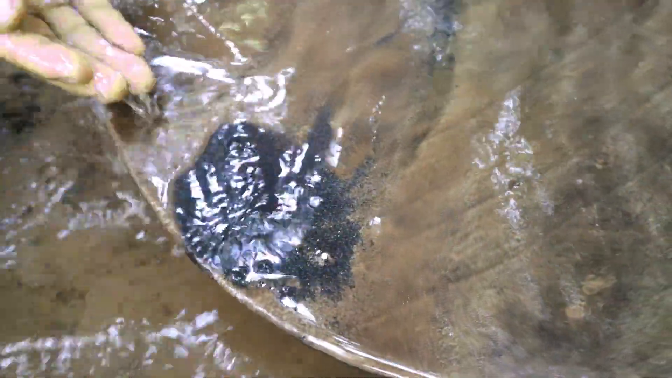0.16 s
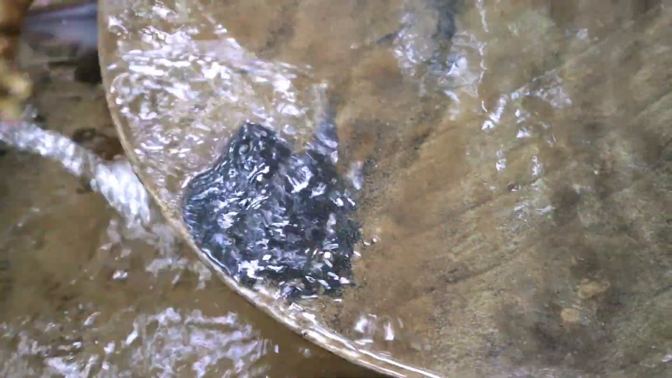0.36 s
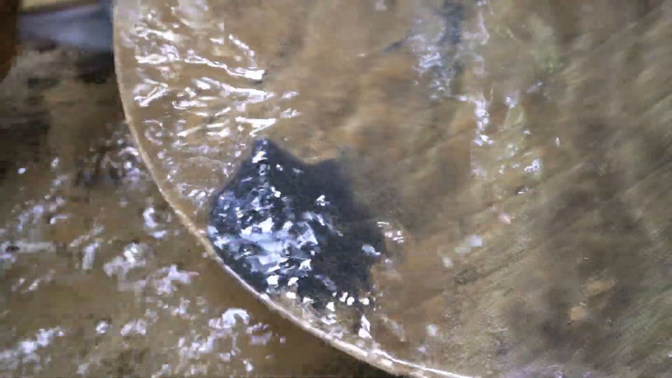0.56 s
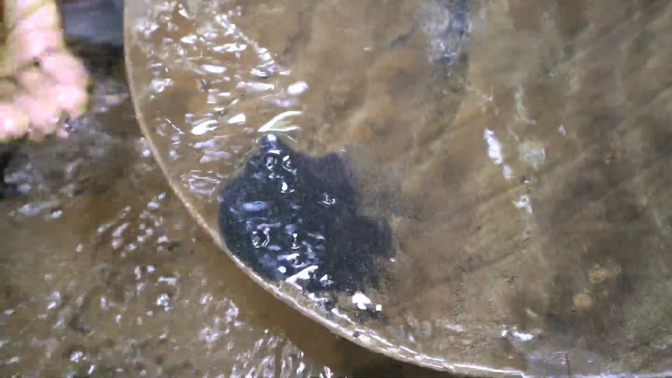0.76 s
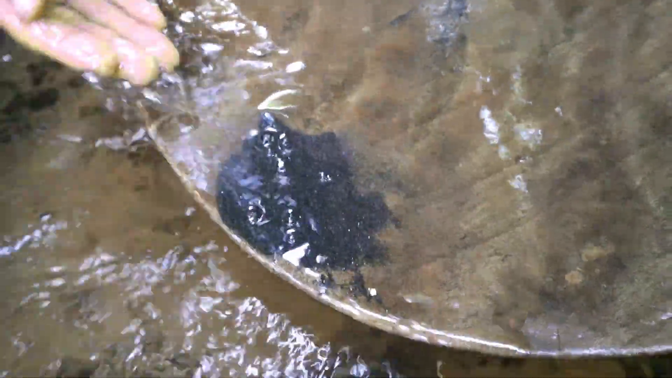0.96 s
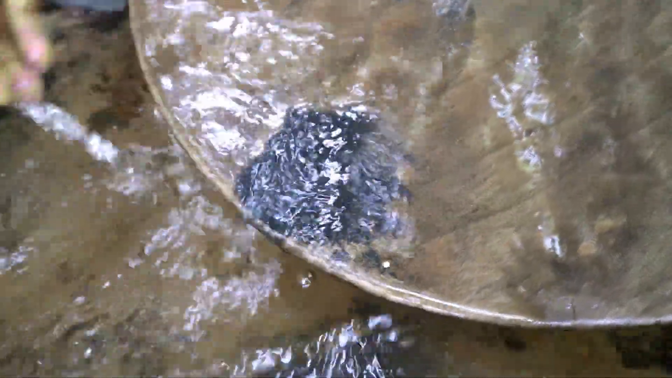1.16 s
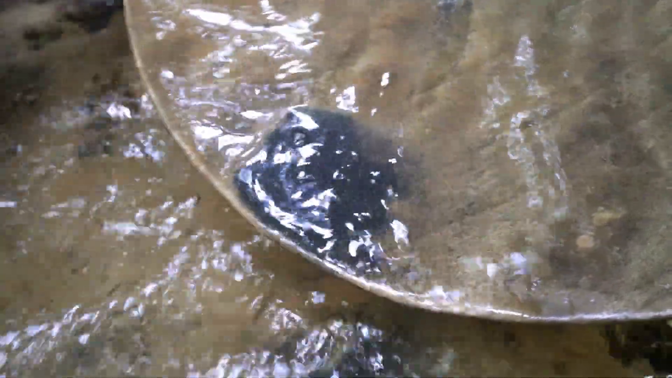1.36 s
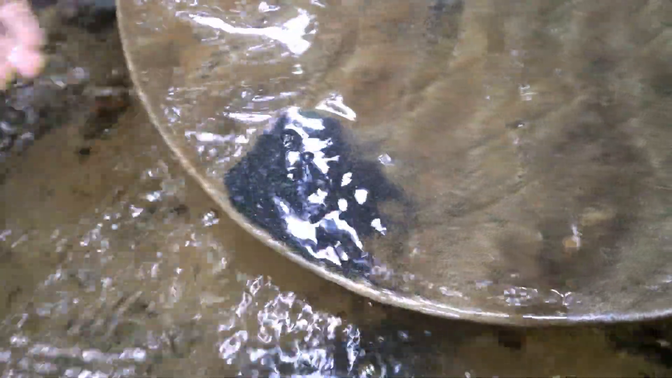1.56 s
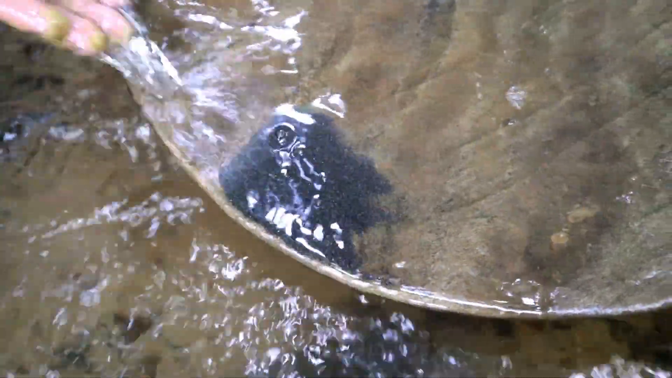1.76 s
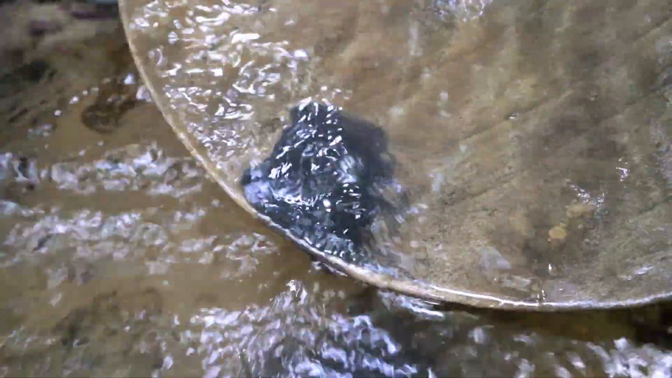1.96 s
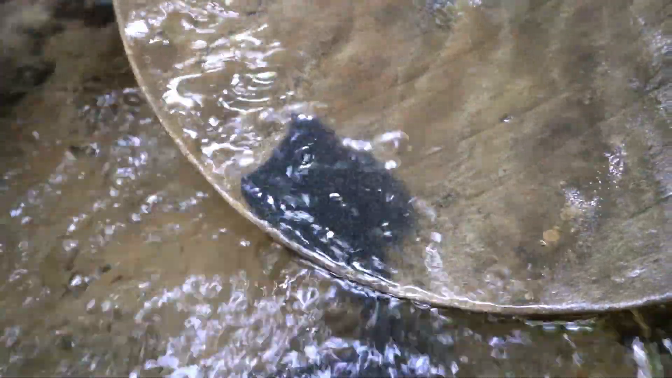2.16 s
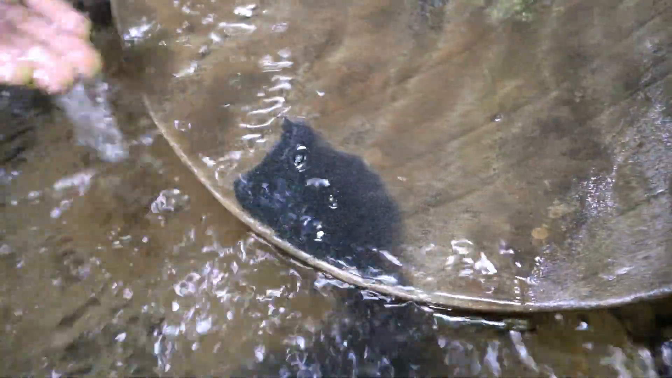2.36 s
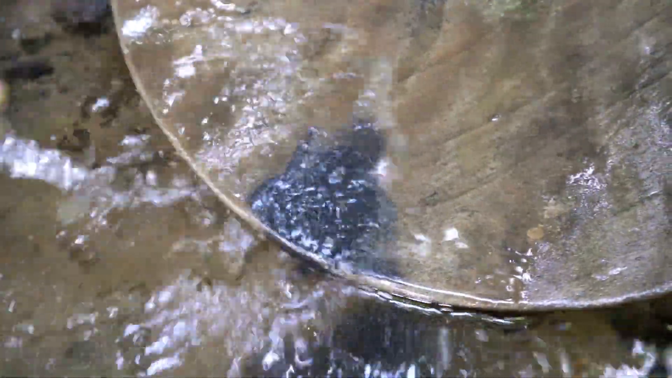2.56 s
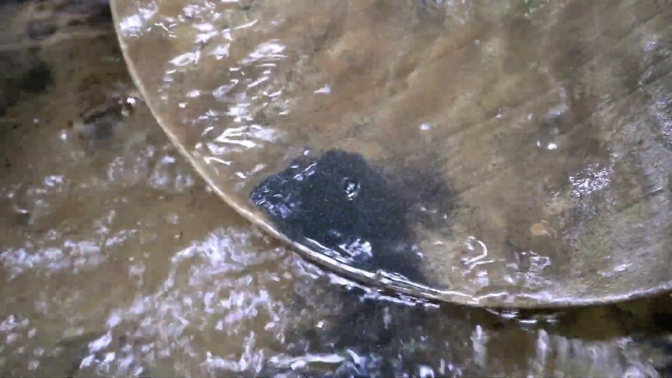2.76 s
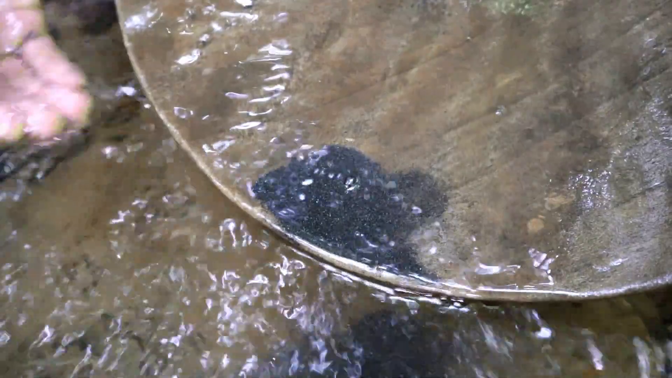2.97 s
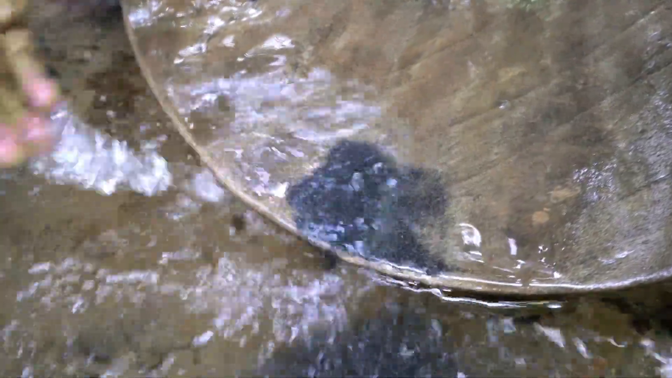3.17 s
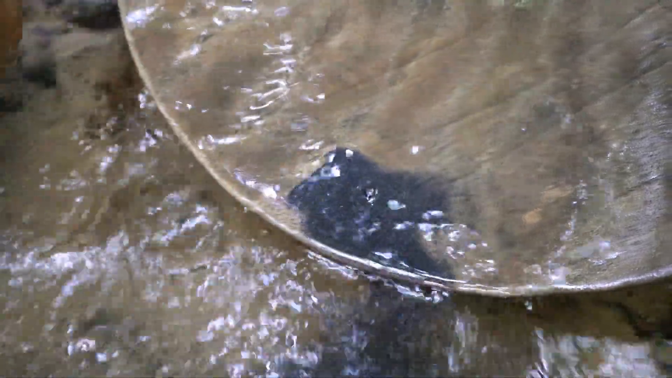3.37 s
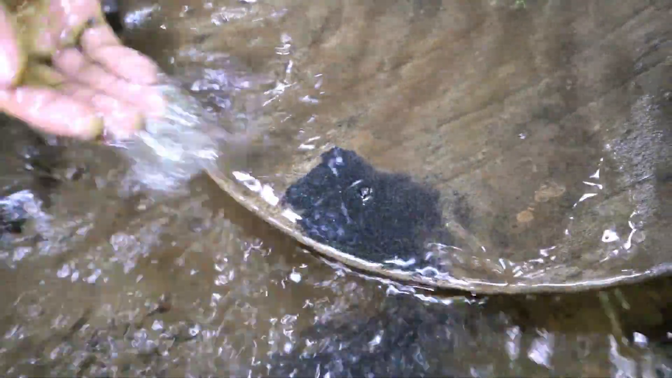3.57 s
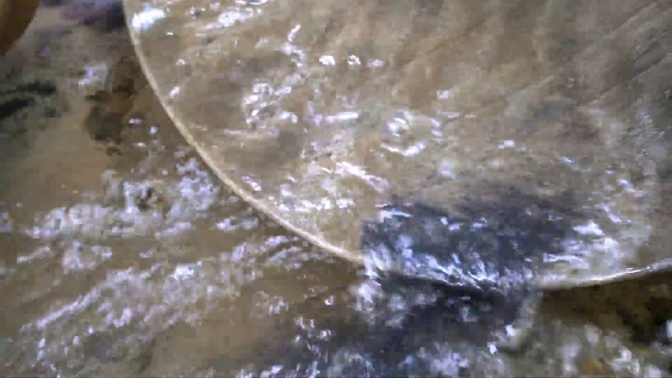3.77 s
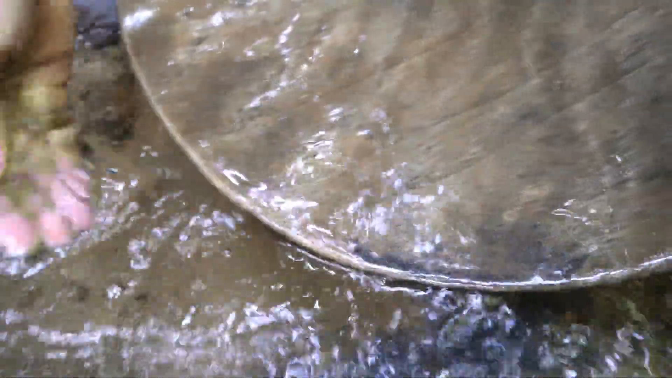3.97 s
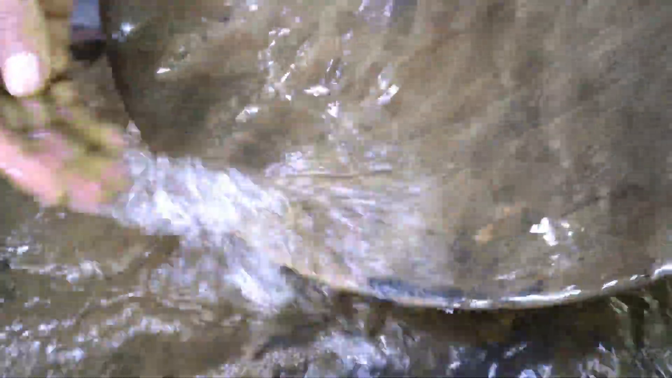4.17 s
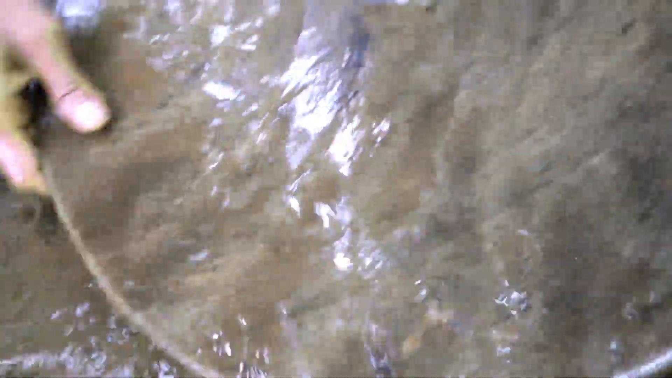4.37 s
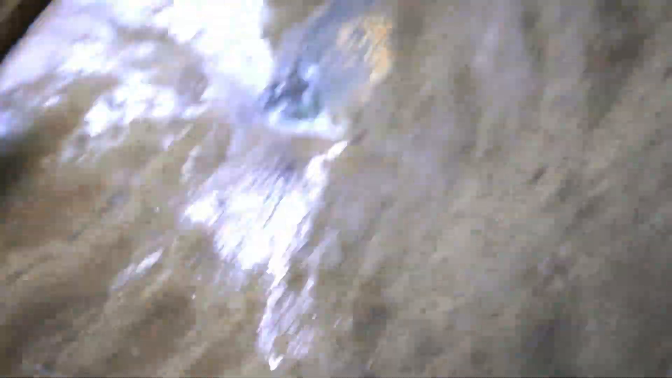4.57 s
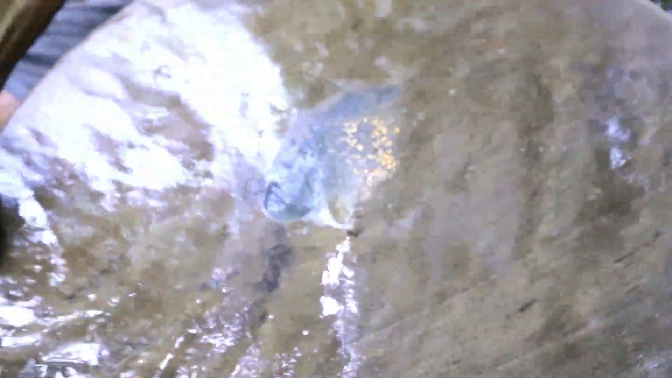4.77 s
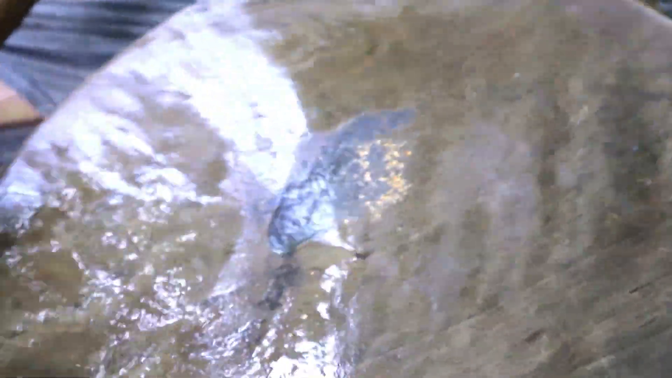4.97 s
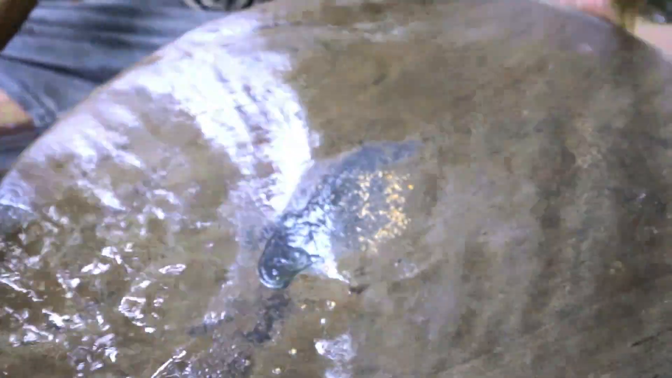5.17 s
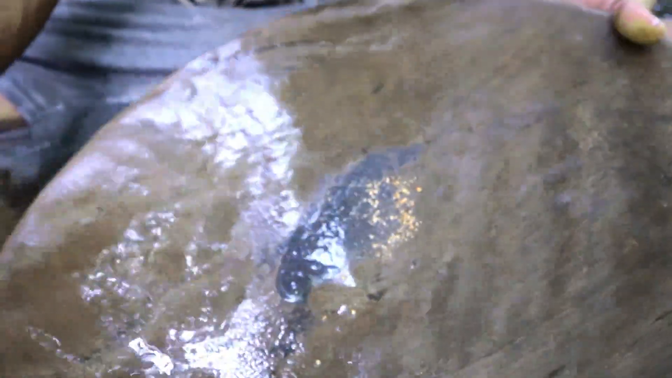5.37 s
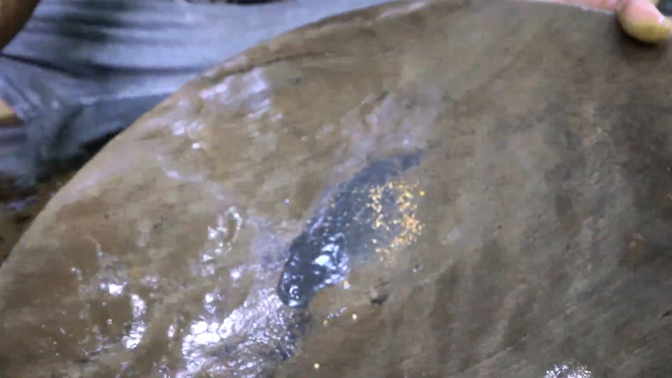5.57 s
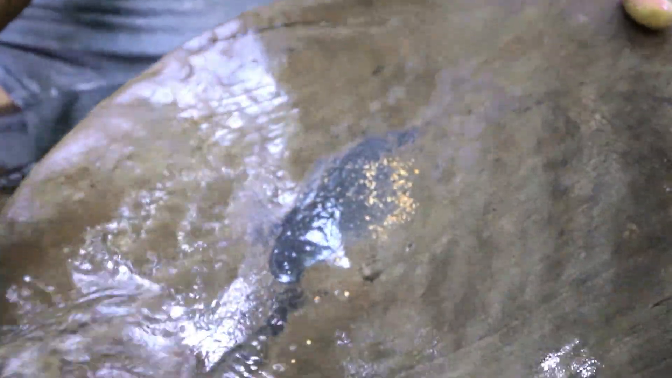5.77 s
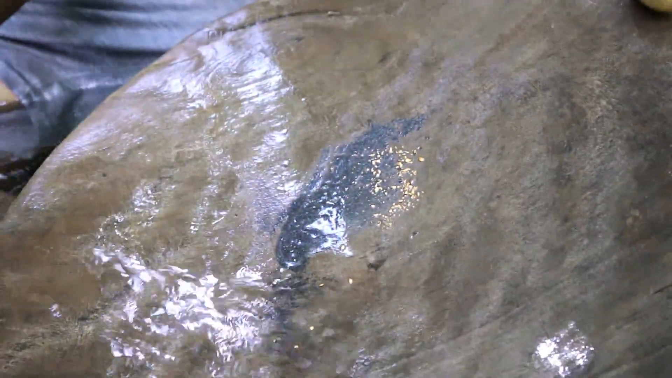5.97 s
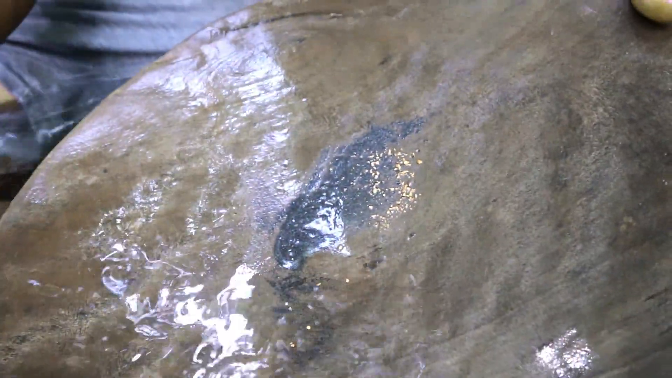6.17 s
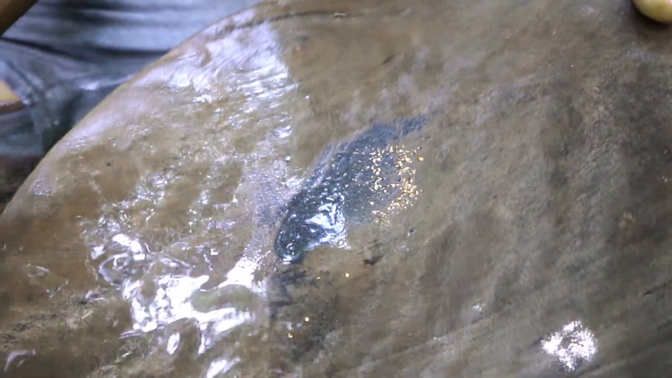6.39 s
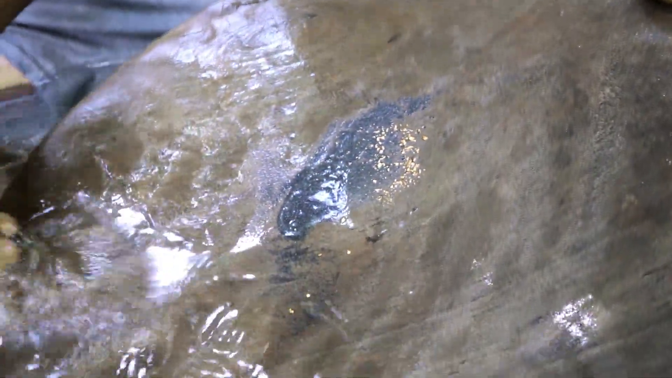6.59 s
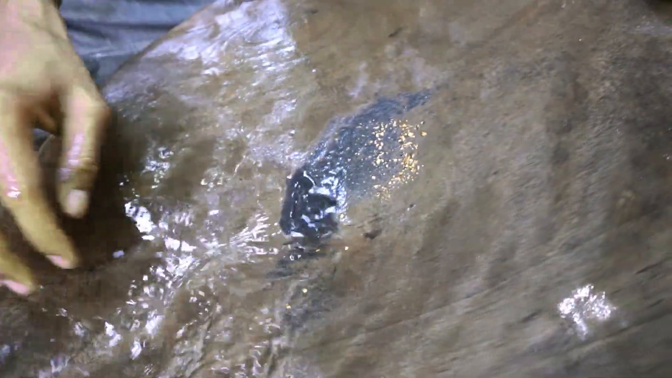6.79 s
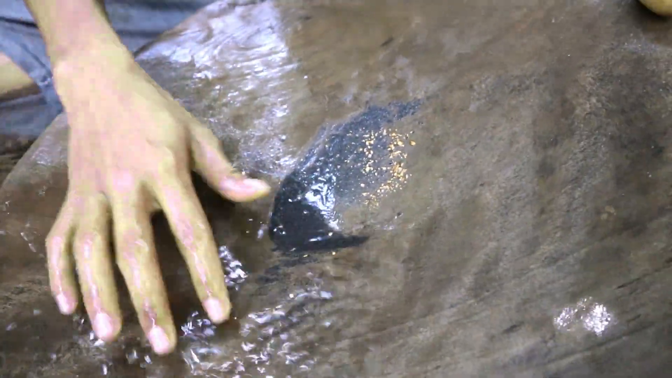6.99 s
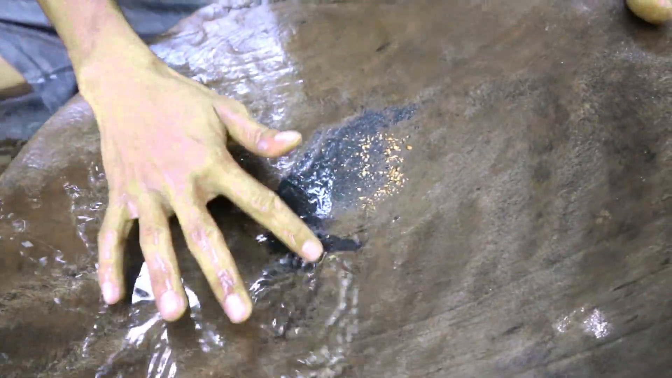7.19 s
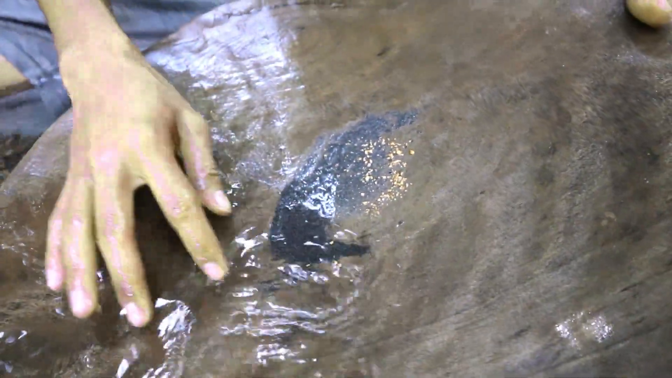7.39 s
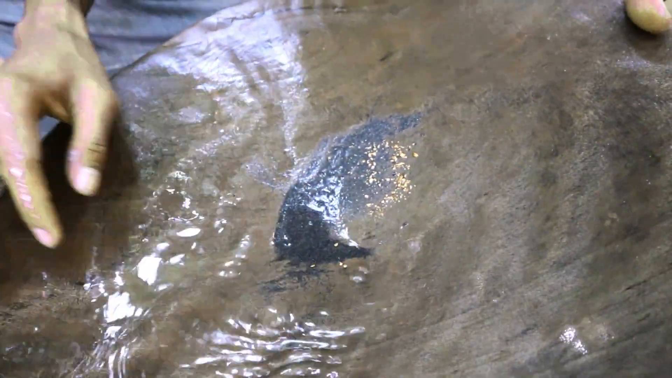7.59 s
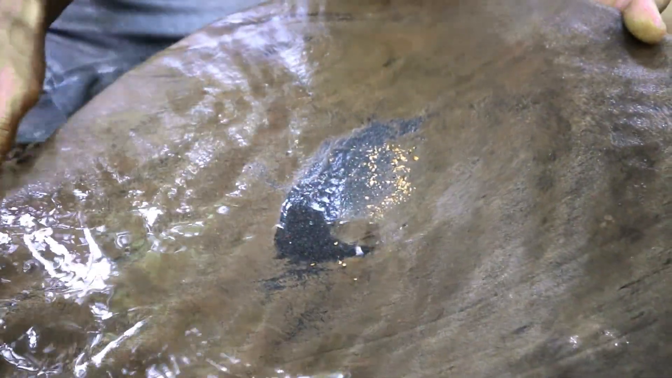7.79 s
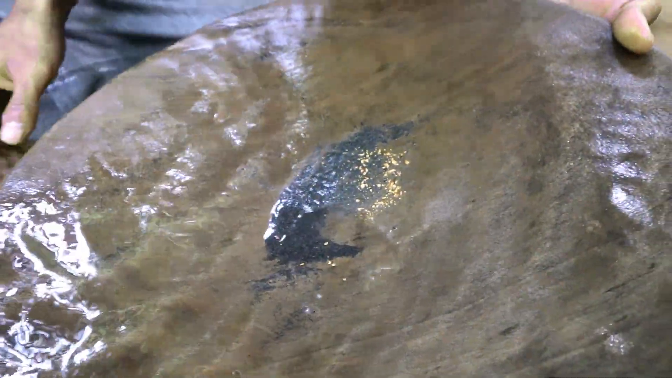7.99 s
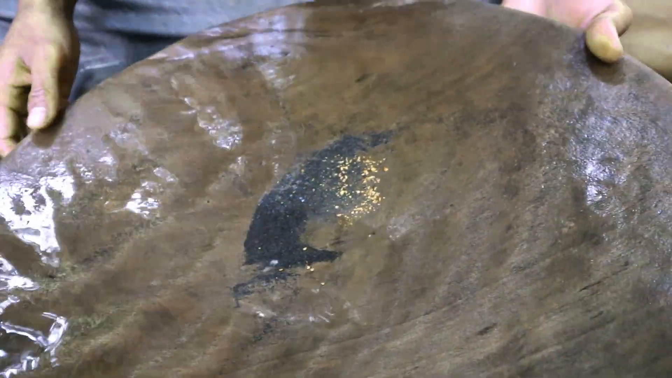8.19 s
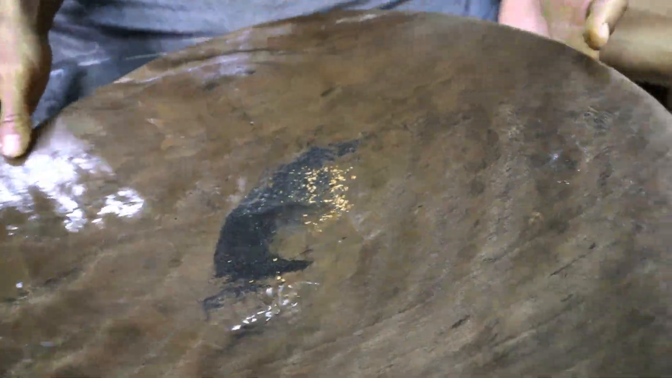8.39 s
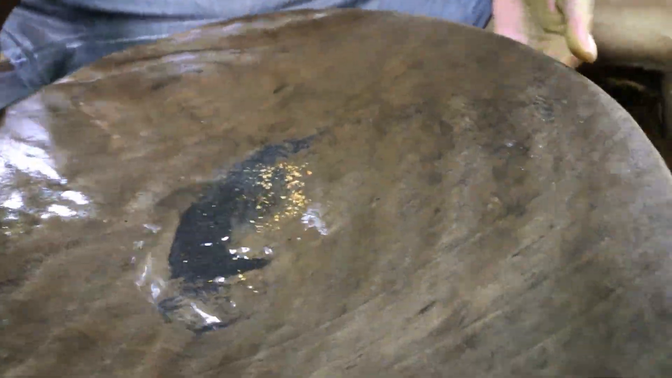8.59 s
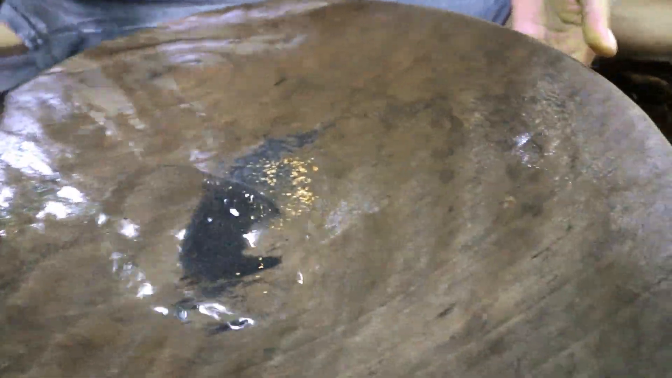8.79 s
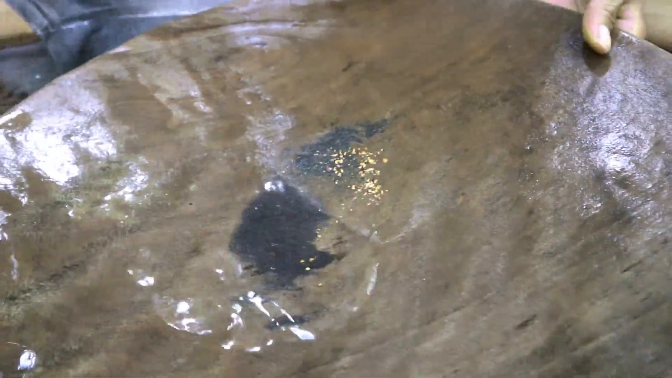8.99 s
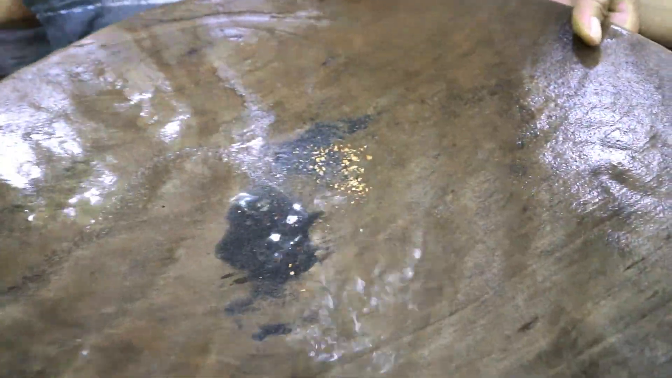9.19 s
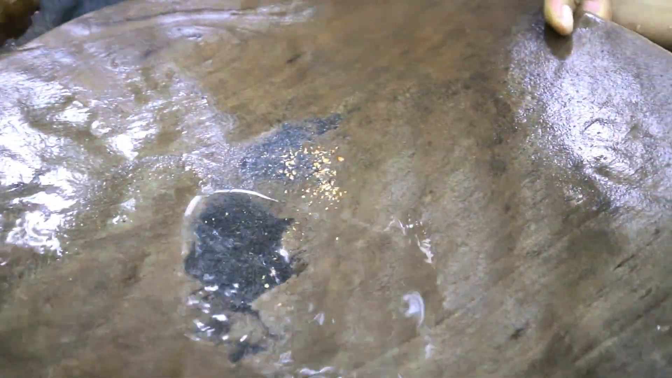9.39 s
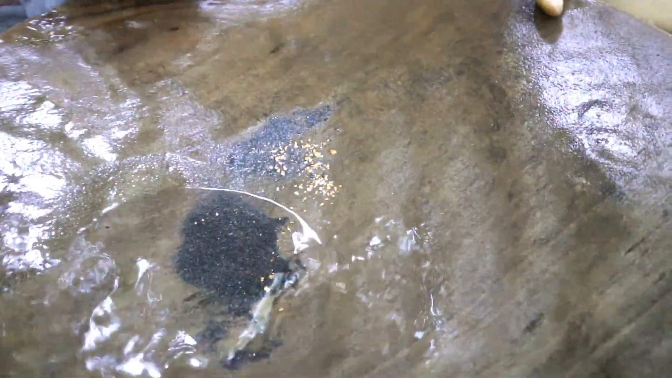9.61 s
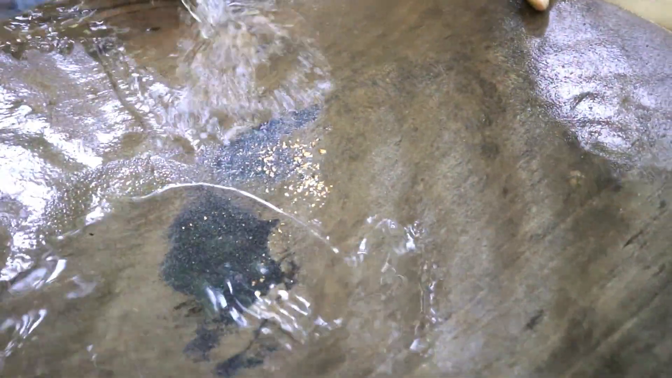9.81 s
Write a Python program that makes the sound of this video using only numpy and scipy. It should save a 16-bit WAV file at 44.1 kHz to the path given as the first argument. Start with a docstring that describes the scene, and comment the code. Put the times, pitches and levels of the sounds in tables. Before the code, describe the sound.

Outdoors by a shallow stream, close stereo microphone. Throughout, soft flowing water, airy far-insect hiss that swells and fades, and a steady, pulsing cicada whine around 4.3 kHz. At 0 s a harsh insect buzz dies away by 0.5 while hand-scooped water makes hollow ringing plops and a bubbly run in the wooden pan. Slaps and trickles follow near 0.8-1.1, 1.8 and 2.5 s. A lower rasping drone runs 0.4-2.7 s, sweeps into a clear upward whoop until 3.4, then a buzz until 3.95; the drone resumes to the end. Busy plops and splats fill 3.2-4.3 s. Dull low knocks and gurgling, gritty wet sand come at 4.4-5.3, with sharp splats at 4.8 and 5.4. More splashes at 5.8 and 6.8, a faint distant whoop at 6.1, then mostly insects and stream. Light knocks, a sand slide and a splat occur around 8.8-9.1, a thin watery swish and faint whoop from 9.3.

```python
"""Water trickles, plops and splats close by while a cicada's buzz dies away over steady whining.
A wooden gold pan is filled by hand and swirled at a shallow stream: ringing bubbles, noise bursts, spray.
The pan knocks softly (low damped sines) and wet sand slides in it (noise surges).
Two cicadas whine (pulsed resonances); another drones, whoops upward, buzzes and drones again (clicked tones).
Behind: a running stream and far insects (shaped noise)."""
import sys
import numpy as np
from scipy import signal
from scipy.fft import next_fast_len
from scipy.io import wavfile
from scipy.ndimage import uniform_filter1d

SR = 44100
rng = np.random.default_rng(int(sys.argv[2]) if len(sys.argv) > 2 else 0)


def log_audio(samples):
    """Write samples as a 16-bit WAV file to the path given in sys.argv[1]."""
    # one column per channel
    frames = np.atleast_2d(samples).T
    # limit to full scale, then quantise
    limited = np.clip(frames, -1, 1)
    pcm = np.round(limited * 32767).astype(np.int16)
    wavfile.write(sys.argv[1], SR, pcm)


N = 434385
TIME = np.arange(N) / SR


def amp(db):
    """Decibels to gain."""
    return 10 ** (np.asarray(db) / 20)


def unit(x):
    """Scales to rms 1."""
    return x / np.sqrt(np.mean(x ** 2) + 1e-20)


def read(points, hz):
    """Reads a spectrum on a log-frequency axis."""
    f, value = np.transpose(points)
    return np.interp(np.log(hz + 1), np.log(f + 1), value)


def follow(rows, t=TIME):
    """Reads every column of a curve at the times t."""
    s, *columns = np.transpose(rows)
    return [np.interp(t, s, c) for c in columns]


def since(start):
    """Seconds since a start, 0 before it."""
    return np.maximum(TIME - start, 0)


def during(start, end, rise, fall):
    """Envelope: rises from the start, holds at 1, reaches 0 at the end."""
    return np.clip(np.minimum((TIME - start) / rise, (end - TIME) / fall), 0, 1)


def add(mix, s, sound):
    """Mixes a sound in at a time."""
    part = mix[max(round(s * SR), 0):][:len(sound)]
    part += sound[:len(part)]


def wander(hz):
    """Random curve: 2 * hz normal knots a second, joined by straight lines."""
    knots = rng.standard_normal(4000)
    return np.interp(TIME * 2 * hz, np.arange(len(knots)), knots)


def band(x, hz, octaves):
    """Band-pass reaching the given octaves either side of hz."""
    edges = np.clip([hz / 2 ** octaves, hz * 2 ** octaves], 10, SR * .49)
    return signal.sosfilt(signal.butter(3, edges, "band", fs=SR, output="sos"), x)


# likeness of the two microphone ports: (frequency [Hz], correlation [-1..1])
LIKENESS = [(50, 1), (140, 0.02), (2000, 0.012), (7000, 0.69)]
# phase by which the left port leads: (frequency [Hz], phase [rad])
PORT_PHASE = [(1200, 0), (4300, 2.5), (7000, 3)]


def noise(shape_db, patchy_db, near=False):
    """Stereo noise under shape_db(s, Hz), in drifting patches; near noise is in phase and alike at the ports."""
    hz = np.fft.rfftfreq(1024, 1 / SR)
    t = np.arange(N // 256 + 5) * 256 / SR
    a, b, c, d, patches = rng.standard_normal((len(t), len(hz), 5)).T
    patches = uniform_filter1d(patches, size=10, axis=0)
    patches = unit(uniform_filter1d(patches, size=6, axis=1))
    same = np.clip(.75 if near else read(LIKENESS, hz)[:, None], -1, 1)
    turn = 1 if near else np.exp(-1j * read(PORT_PHASE, hz))[:, None]
    left = a + 1j * b
    right = turn * (same * left + np.sqrt(1 - same ** 2) * (c + 1j * d))
    z = np.array([left, right]) * amp(shape_db(t, hz[:, None]) + patchy_db * patches)
    return unit(signal.istft(z, nperseg=1024, noverlap=768)[1][:, :N])


def echoes(x, t60, wet_db):
    """Adds scattered echoes, different at each port, keeping the level."""
    t = np.arange(SR // 2) / SR
    tail = rng.standard_normal((2, len(t))) * amp(-60 * t / t60) * (t > .001)
    wet = signal.fftconvolve(x[None], tail, axes=1)[:, :N]
    wet *= x.std() / wet.std(axis=1, keepdims=True)
    return (x + amp(wet_db) * wet) / np.sqrt(1 + amp(wet_db) ** 2)


def bubble(hz, rise, life):
    """A trapped bubble rings; its pitch glides by rise [octaves/s], upward as it nears the surface."""
    t = np.arange(0, 3 * life, 1 / SR)
    turns = np.cumsum(hz * 2 ** (rise * np.minimum(t, 2 * life))) / SR
    return np.sin(2 * np.pi * turns) * (1 - np.exp(-t / 0.00015)) * np.exp(-(t / life) ** 2.0)


def droplets(per_s, low_hz, high_hz, cycles, spread_db):
    """A random patter of small bubbles, a few louder than the rest."""
    out = np.zeros(N)
    for when, size, pitch, rise, life in rng.random((int(per_s * N / SR), 5)):
        hz = low_hz * (high_hz / low_hz) ** pitch
        size_db = spread_db * min(-np.log(1 - size), 2.6)
        add(out, when * N / SR, amp(size_db) * bubble(hz, 24 * (rise - .25), cycles * (.5 + life) / hz))
    return unit(out)


# large bubbles: (time [s], level [dB], pitch [Hz], pitch rise [octaves/s], life [s])
BUBBLES = [(.182, -27.5, 1133, -4, 0.013), (0.297, -23, 653, -2.5, 0.025), (.325, -39, 642, 3, 0.061),
           (1.05, -45, 793, -1.5, .04), (.464, -31, 1154, 0, 0.0097), (1.812, -30.5, 805, -4, 0.03),
           (3.205, -23, 2575, 6, 0.0024), (3.467, -36.5, 538, 34.5, 0.026), (3.497, -21.5, 670, 48, 0.0091),
           (3.7, -33.5, 630, 10, 0.018), (4.0, -28.5, 545, 37, 0.023), (4.423, -26.5, 540, 25, 0.0073),
           (4.487, -33.5, 610, 24, 0.0059), (5.207, -31.5, 587, 5, 0.02), (5.365, -35.5, 1355, 9, 0.025),
           (5.88, -34.5, 1265, 14, 0.011), (9.372, -40, 1000, 8, 0.023), (9.463, -40.5, 456, -5, 0.004)]
# small bubbles as water closes over them: (time [s], level [dB], pitch [Hz])
PLINKS = [(.115, -44, 1180), (0.223, -38, 700), (.264, -40, 1100), (0.371, -40, 1200), (0.965, -37, 1680),
          (1.518, -34, 1123), (1.556, -32.5, 2370), (1.575, -39.5, 1230), (1.968, -33, 2770),
          (2.204, -47.5, 640), (2.353, -39, 1970), (2.886, -42, 1084), (2.96, -42, 1650),
          (3.234, -40, 1250), (3.262, -39, 1690), (3.551, -37.5, 1610), (3.754, -41.5, 1190),
          (4.154, -35, 1380), (5.324, -42, 1130), (5.422, -32, 1510), (5.52, -37, 2210), (6.418, -48, 1110),
          (6.618, -42, 1160)]
PLINK_CYCLES, PLINK_RISE_OCT_PER_S = 12.6, 18.8
PLINK_WET_DB, PLINK_WET_DECAY_S = -9, .005
# water slapping the wood: (time [s], level [dB], trapped-air pitch [Hz])
SPLATS = [(.842, -33, 920), (1.024, -33.5, 1410), (1.063, -36, 1290), (1.136, -42, 1330),
          (1.811, -27, 1120), (1.997, -39, 1400), (2.467, -39, 2420), (2.592, -39, 1590),
          (2.619, -35.5, 864), (3.591, -38.5, 1520), (3.695, -27.5, 1010), (3.722, -39, 2100),
          (3.797, -34, 2620), (4.206, -33.5, 2900), (4.279, -34, 2080), (4.811, -25.5, 1520),
          (5.285, -42.5, 980), (5.41, -24.5, 1540), (5.752, -32.5, 1120), (5.793, -39, 695),
          (5.8, -30.5, 1570), (6.459, -45, 580), (6.758, -23.5, 842), (9.008, -34, 1084)]
CRACK_DB, CRACK_HZ, CRACK_DECAY_S = -10, 3900, 0.0014  # dB against the slap
SPLAT_DB, SPLAT_DECAY_S, SPLAT_PITCH_RATIO = 2, 0.0027, 1.12  # burst, against the slap
TRAPPED_CYCLES, TRAPPED_RISE_OCT_PER_S = 6.5, 4.5


def plops():
    """Bubbles ring, plinks ring in a wet burst, slaps give a bright tick, a burst and a short bubble."""
    out, t = np.zeros(N), np.arange(SR // 8) / SR

    def burst(hz, decay):
        """A dying puff of noise around hz."""
        puff = band(rng.standard_normal(len(t)) * np.exp(-t / decay), hz, octaves=0.83)
        return unit(puff) * np.sqrt(decay / (2 * t[-1]))

    for s, db, hz, rise, life in BUBBLES:
        add(out, s, amp(db) * bubble(hz, rise, life))
    for s, db, hz in PLINKS:
        add(out, s, amp(db) * bubble(hz, PLINK_RISE_OCT_PER_S, PLINK_CYCLES / hz))
        add(out, s, amp(db + PLINK_WET_DB) * burst(hz, PLINK_WET_DECAY_S))
    for s, db, hz in SPLATS:
        add(out, s, amp(db + CRACK_DB) * burst(CRACK_HZ, CRACK_DECAY_S))
        add(out, s, amp(db + SPLAT_DB) * burst(hz * SPLAT_PITCH_RATIO, SPLAT_DECAY_S))
        add(out, s, amp(db) * bubble(hz, TRAPPED_RISE_OCT_PER_S, TRAPPED_CYCLES / hz))
    return out


DRIPS_END_S = 7  # they fade out as the scooping stops


def stray_drips():
    """Faint drips fall from the rim or the wet hand and chirp in the stream."""
    drips = droplets(per_s=16, low_hz=1000, high_hz=3116, cycles=12, spread_db=3)
    return amp(-60) * during(-1, DRIPS_END_S, 1, 2) * drips


# runs of water over the wood: (start [s], length [s], level [dB])
SWIRL = [(0.02, 0.49, -55.5), (0.702, 0.71, -62.5), (1.517, 0.15, -67), (1.812, 0.28, -64),
         (2.323, 0.095, -56), (2.522, 0.16, -50), (2.864, 0.36, -61), (3.173, 0.14, -48),
         (3.475, 0.38, -52.5), (4.133, 0.23, -48.5), (4.749, 0.051, -39), (5.346, 0.17, -49),
         (5.743, 0.26, -55.5), (6.337, 0.37, -62), (8.944, 0.1, -53.5), (9.288, 0.44, -56.5)]
RUN_RISE_S, RUN_FALL_S, TRICKLE_DB = 0.02, 0.064, -73  # runs over a steady trickle
SCATTER_DB, SCATTER_DECAY_S = -21, 0.02  # drops a slap scatters, dB against the slap
# spray spectrum: (frequency [Hz], relative level [dB])
SPRAY = [(300, 0), (900, 0.5), (2200, -8), (5500, -0.5), (14000, -38)]


def pan_water():
    """Each run of water and each slap drives small bubbles and a fine spray; the bowl reflects the bubbles."""
    runs = sum(amp(db) * during(s, s + length, RUN_RISE_S, RUN_FALL_S) for s, length, db in SWIRL)
    flow = amp(TRICKLE_DB) + runs
    for s, db, _ in SPLATS:
        add(flow, s, amp(db + SCATTER_DB) * np.exp(-np.arange(SR // 2) / SR / SCATTER_DECAY_S))
    slosh = droplets(per_s=300, low_hz=980, high_hz=2450, cycles=9.0, spread_db=8.5)
    patter = amp(0.5) * droplets(per_s=240, low_hz=1985, high_hz=6550, cycles=6.8, spread_db=6.5)
    spray = amp(-6) * noise(lambda t, hz: read(SPRAY, hz), patchy_db=4.5, near=True)
    spray *= amp(4 * wander(45))  # level flickers
    wet = plops() + stray_drips() + flow * (slosh + patter)
    return echoes(wet, t60=0.078, wet_db=-4) + flow * spray


# fine drops on the wood: (time [s], level before band-pass and echoes [dB])
TICKS = [(.154, -25.5), (0.336, -31), (1.744, -29), (1.879, -29), (3.694, -28), (4.216, -30), (4.305, -31),
         (5.286, -33), (6.091, -28)]


def spray_ticks():
    """Fine drops land all around the bowl, each a sharp, bright tick, mostly echo."""
    out, t = np.zeros(N), np.arange(SR // 50) / SR
    for s, db in TICKS:
        add(out, s, amp(db) * rng.standard_normal(len(t)) * np.exp(-t / 0.0011))
    return echoes(band(out, hz=4860, octaves=0.78), t60=0.099, wet_db=10)


# knocks of the pan lifted and shifted: (time [s], level [dB], pitch [Hz])
BUMPS = [(4.418, -40, 130), (4.661, -28.5, 56), (4.834, -42, 54.3), (4.985, -35.5, 50.7), (5.13, -43, 51.7),
         (8.805, -42.5, 396), (8.995, -42.5, 399)]
# wet sand sliding as the pan tilts: (start [s], length [s], level [dB])
SLIDE = [(4.42, 0.13, -50), (4.588, 0.17, -46), (4.745, 0.15, -46.5), (4.887, 0.18, -49.5),
         (5.057, 0.16, -51), (5.195, 0.06, -47), (5.27, 0.074, -52), (8.801, 0.062, -52.5),
         (8.931, 0.14, -49.5)]
SLIDE_SKEW = 0.79  # below 1: surges swell faster than they die
# sand spectrum: (frequency [Hz], relative level [dB])
SAND = [(40, -1), (120, -10.5), (300, -11.5), (380, -1.5), (460, -17), (580, 2), (720, -6), (900, -6),
        (3500, -31)]


def pan_lift():
    """Soft knocks (damped sines), and wet sand sliding and gurgling over the wood."""
    out, t = np.zeros(N), np.arange(SR // 4) / SR
    for s, db, hz in BUMPS:
        swell = t / 0.0049
        add(out, s, -amp(db) * swell * np.exp(1 - swell) * np.sin(2 * np.pi * hz * t))
    grit = noise(lambda t, hz: read(SAND, hz), patchy_db=6.5, near=True)
    gurgle = amp(-4) * droplets(per_s=90, low_hz=345, high_hz=794, cycles=6.9, spread_db=4.5)
    sliding = np.zeros(N)
    for s, length, db in SLIDE:
        progress = np.minimum(since(s) / length, 1)
        sliding += amp(db) * np.sin(np.pi * progress ** SLIDE_SKEW)
    return out + sliding * (grit + gurgle)


def from_pan(x):
    """The pan lies a little to the left: its sound reaches the right port 4 samples later."""
    return np.array([x[0], np.roll(x[1], 4)])


def from_trees(x, t60, wet_db, phase, pan_db):
    """A far insect: echoes off the trunks, and a phase and level step between the ports."""
    left, right = echoes(x, t60, wet_db)
    right = (signal.hilbert(right, next_fast_len(N))[:N] * np.exp(-1j * phase)).real
    return np.array([left * amp(pan_db / 2), right * amp(-pan_db / 2)])


# whine spectrum: (offset from the pitch [pulse rates], relative level [dB])
WHINE_LINES = [(-2, -8), (-1, 3.5), (0, -1.5), (1, 0), (2, -9.5)]


def trill(hz):
    """Tymbal pulses, some 42 a second, ring one sharp resonance that follows the curve hz."""
    turns = np.cumsum(hz + 1.21 * wander(6)) / SR
    pulses = turns / 102
    song = np.zeros(N)
    for k, db in WHINE_LINES:
        level = amp(db + 1.5 * wander(4))
        # the resonance delays the lines on either side of its centre
        lag = .42 * k ** 2 + .28 * wander(2)
        song += level * np.cos(2 * np.pi * (turns + round(k) * pulses) + lag)
    return unit(song * amp(1.1 * wander(30)))


# loudness of the nearer whine: (time [s], level before WHINE_GAIN_DB [dB])
WHINE = [(0.0, -56), (0.33, -50), (1.48, -47.5), (6.2, -51), (6.5, -53.5), (8.04, -50), (8.7, -54),
         (9.85, -49)]
WHINE_HZ, WHINE_DRIFT_HZ_PER_S, WHINE_GAIN_DB = 4283, 1.2, 5
NEIGHBOUR_HZ, NEIGHBOUR_DRIFT_HZ_PER_S, NEIGHBOUR_DB = 4284, 13, -54.5  # farther off, climbs faster


def whining_cicada():
    """One cicada trills steadily, a neighbour beats against it, and others of their kind blur behind."""
    song = amp(follow(WHINE)[0] + WHINE_GAIN_DB) * trill(WHINE_HZ + WHINE_DRIFT_HZ_PER_S * TIME)
    song += amp(NEIGHBOUR_DB) * trill(NEIGHBOUR_HZ + NEIGHBOUR_DRIFT_HZ_PER_S * TIME)
    others = noise(lambda t, f: -14 * np.log1p(((f - 4330) / 120) ** 2), patchy_db=-1.5)
    return from_trees(song, t60=.12, wet_db=-11, phase=2.0, pan_db=-.5) + amp(-55.5) * others


def rasping(turns, rough, hz):
    """A tone whose strength and phase flutter at random, up to hz times a second."""
    flutter = 1 + rough * (wander(hz) + 1j * wander(hz))[:len(turns)]
    return unit((flutter * np.exp(2j * np.pi * turns)).real)


# drones: (start [s], end [s], level at the start [dB])
DRONES = [(.36, 2.75, -51.5), (3.82, 9.95, -54)]
DRONE_HZ, DRONE_SETTLE_HZ, DRONE_SETTLE_S = 1817, 199.5, .05
DRONE_CREEP_HZ_PER_S2, DRONE_FADE_DB_PER_S, DRONE_EDGE_S = 1.6, 0.38, 0.08


def drone():
    """A rasping tone that settles from above, then slowly creeps up and weakens."""
    out = np.zeros(N)
    for start, end, db in DRONES:
        age = since(start)
        hz = DRONE_HZ + DRONE_SETTLE_HZ * np.exp(-age / DRONE_SETTLE_S) + DRONE_CREEP_HZ_PER_S2 * age ** 2
        turns = np.cumsum(hz + 14 * wander(60)) / SR
        tone = rasping(turns, rough=.6, hz=70)
        # the tymbal clicks add a faint side tone above the drone
        tone += amp(-10) * np.sin(2 * np.pi * (turns + np.cumsum(315 + 25 * wander(30)) / SR))
        level = amp(db - DRONE_FADE_DB_PER_S * age)
        out += during(start, end, DRONE_EDGE_S, DRONE_EDGE_S) * level * tone
    return out


# whoops, one near and two far answers: (start [s], gain over the swells [dB])
WHOOPS = [(2.679, 6), (6.052, -14), (9.349, -15)]
# swells shared by the whoops, and panning: (time [s], level before gain [dB], left over right [dB])
WHOOP_SWELLS = [(2.68, -60, -2.0), (2.73, -49, -2), (2.862, -50.5, 0), (2.976, -47, -9.5), (3.15, -52, -7),
                (3.33, -42, 5), (3.42, -56, -1)]
# whoop spectrum: (offset from the pitch [click rates], relative level [dB])
WHOOP_LINES = [(-3, -26), (-2, -10.5), (-1, -22), (0, 1), (2, -10)]
WHOOP_LENGTH_S, WHOOP_EDGE_S = 0.75, 0.039
WHOOP_HZ, WHOOP_CREEP_HZ_PER_S, WHOOP_SWEEP_HZ, WHOOP_SWEEP_S = 2914, 100, 332, .07


def whoop():
    """A tone sweeps up, then creeps on in a few swells; tymbal clicks put buzzing side tones around it."""
    out, clicks = np.zeros(N), np.cumsum(156 + 3 * wander(30)) / SR
    for start, db in WHOOPS:
        level = during(start, start + WHOOP_LENGTH_S, WHOOP_EDGE_S, WHOOP_EDGE_S)
        on = level > 0
        age = since(start)[on]
        hz = WHOOP_HZ + WHOOP_CREEP_HZ_PER_S * age - WHOOP_SWEEP_HZ * np.exp(-age / WHOOP_SWEEP_S)
        turns = np.cumsum(hz) / SR
        lines = [amp(d) * rasping(turns + round(k) * clicks[on], rough=0.23, hz=199) for k, d in WHOOP_LINES]
        swell_db = follow(WHOOP_SWELLS, WHOOP_SWELLS[0][0] + age)[0]
        out[on] += level[on] * amp(db + swell_db) * unit(sum(lines))
    return out


# buzzes: (start [s], end [s], level [dB])
BUZZES = [(-.1, 0.48, -42.5), (3.28, 3.954, -42.5)]
# resonances of the body: (frequency [Hz], relative level [dB])
BUZZ_BODY = [(2200, -33), (2580, 2.5), (2730, -5), (3180, -2.5), (3700, -13), (4850, -7), (5000, 8),
             (5300, -1), (5610, -3), (5760, 6.5), (5920, -3.5), (6370, -1), (6700, -15)]
BUZZ_SMEAR = 0.65  # how far the body smears each click (0-1)
BUZZ_CLICKS_PER_S, BUZZ_SAG_PER_S, BUZZ_RISE_S, BUZZ_FALL_S = 151.6, 6.5, 0.085, 0.2


def buzz():
    """Fast tymbal clicks, as harmonics, through the insect's body, slowing as they die."""
    out = np.zeros(N)
    for start, end, db in BUZZES:
        level = during(start, end, BUZZ_RISE_S, BUZZ_FALL_S) ** 2
        on = level > 0
        sag = BUZZ_SAG_PER_S * (since(end - BUZZ_FALL_S) / BUZZ_FALL_S) ** 2
        rate = (BUZZ_CLICKS_PER_S - sag + 0.5 * wander(40))[on]
        turns = np.cumsum(rate) / SR
        tone = np.zeros(len(turns))
        for k in range(14, 56):
            phase = k * turns + BUZZ_SMEAR * rng.random()
            tone += amp(read(BUZZ_BODY, k * rate.mean())) * np.cos(2 * np.pi * phase)
        out[on] += level[on] * amp(db) * unit(tone)
    return out * amp(0.73 * wander(19)) * (1 + 0.29 * wander(150))  # uneven clicks rasp


def calling_cicada():
    """A wavering drone sweeps up into a whoop, then breaks into a buzz of clicks."""
    whoop_pan_db = follow(WHOOP_SWELLS)[1]
    droning = from_trees(drone(), t60=0.26, wet_db=-3.0, phase=0.35, pan_db=-1.5)
    whooping = from_trees(whoop(), t60=0.14, wet_db=-6, phase=1.5, pan_db=whoop_pan_db)
    buzzing = from_trees(buzz(), t60=0.12, wet_db=-6, phase=2.15, pan_db=-2.5)
    return droning + whooping + buzzing


SIZZLE_START_S, SIZZLE_CYCLE_S, SIZZLE_STEP_S, SIZZLE_GLIDE_S = 0.23, 5.95, 1.53, 0.27
SIZZLE_LOW_HZ, SIZZLE_HIGH_HZ = 10840, 11980
SIZZLE_DB, SIZZLE_REST_DB, SIZZLE_RISE_S, SIZZLE_FADE_S = -53, -59, 0.27, 3.9


def sizzle():
    """The highest insects: a band of hiss that swells, steps up in pitch and fades, over and over."""
    def centre_hz(t):
        """The middle of the band at the times t."""
        step = (1 + np.tanh(((t - SIZZLE_START_S) % SIZZLE_CYCLE_S - SIZZLE_STEP_S) / SIZZLE_GLIDE_S)) / 2
        return SIZZLE_LOW_HZ + (SIZZLE_HIGH_HZ - SIZZLE_LOW_HZ) * step

    age = (TIME - SIZZLE_START_S) % SIZZLE_CYCLE_S
    effort = np.clip(np.minimum(age / SIZZLE_RISE_S, (SIZZLE_CYCLE_S - age) / SIZZLE_FADE_S), 0, 1)
    hiss = noise(lambda t, hz: -10 * ((hz - centre_hz(t)) / 2050) ** 2, patchy_db=1.5)
    return amp(SIZZLE_REST_DB + (SIZZLE_DB - SIZZLE_REST_DB) * effort) * hiss


# stream spectrum: (frequency [Hz], relative level [dB])
STREAM = [(30, 1), (90, 5), (250, 2), (600, -1.5), (1200, -8), (3500, -2), (4700, -16.5), (8500, -82),
          (15000, -71)]
# far-insect spectrum: (frequency [Hz], relative level [dB])
CHORUS = [(4700, -62), (5400, 6), (6500, -1.5), (7400, 12), (8100, -3), (10500, -97)]


def surroundings():
    """The running stream and the hiss of far insects, as shaped noise."""
    stream = amp(-54.0) * noise(lambda t, hz: read(STREAM, hz), patchy_db=2.0)
    chorus = amp(-54.0) * noise(lambda t, hz: read(CHORUS, hz), patchy_db=2.5)
    return stream + chorus + sizzle()


def scene():
    """Everything together."""
    pan = from_pan(pan_water() + pan_lift()) + spray_ticks()
    return pan + whining_cicada() + calling_cicada() + surroundings()


EDGE_HZ = 14800


def record(dry):
    """Band limit: a linear-phase low-pass at EDGE_HZ."""
    lowpass = signal.firwin(511, EDGE_HZ, window=("kaiser", 9), fs=SR)
    return signal.oaconvolve(dry, lowpass[None], "same")


dry = scene()
out = record(dry)
log_audio(out)
```